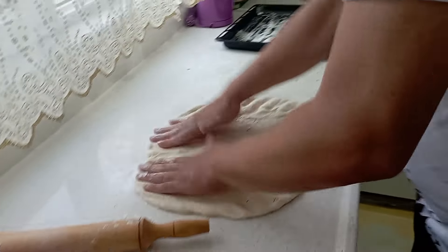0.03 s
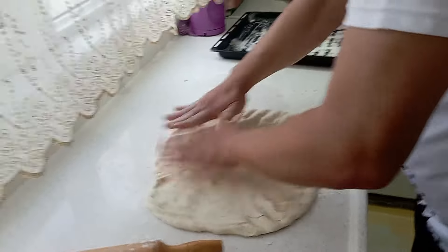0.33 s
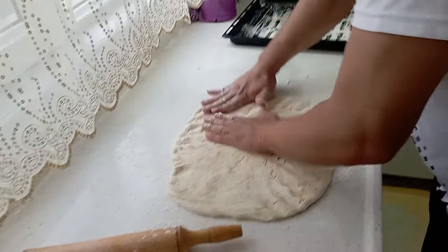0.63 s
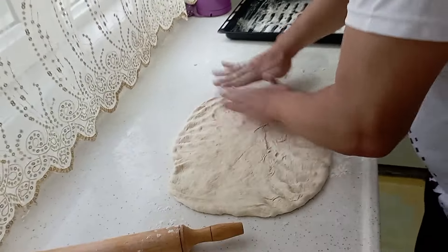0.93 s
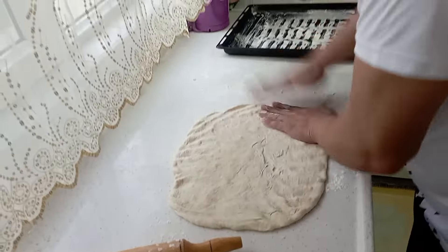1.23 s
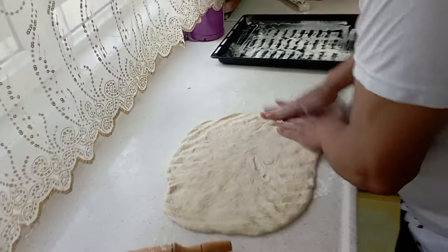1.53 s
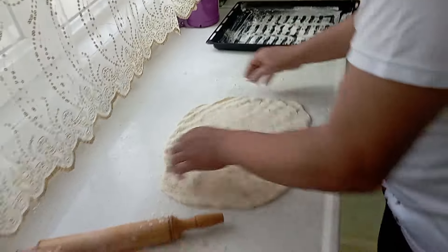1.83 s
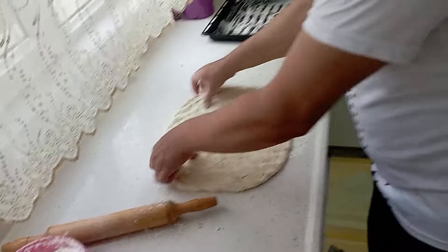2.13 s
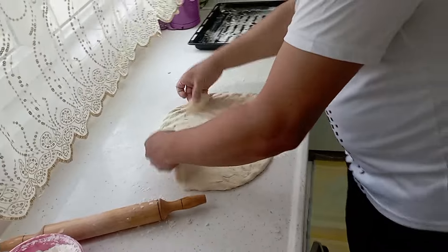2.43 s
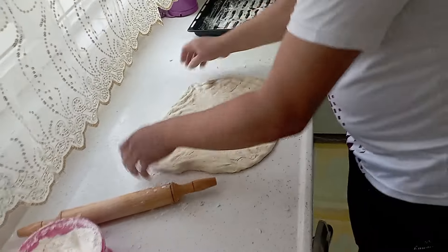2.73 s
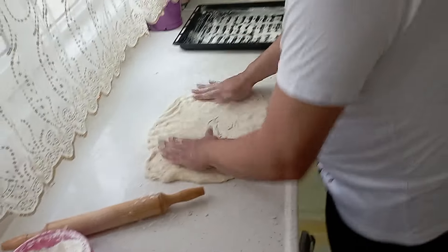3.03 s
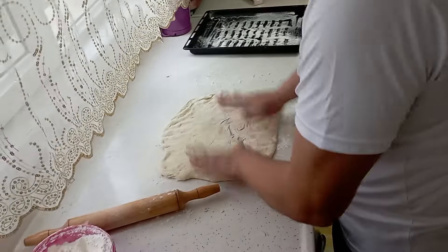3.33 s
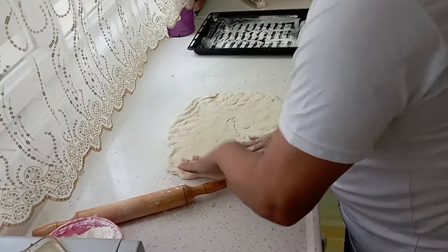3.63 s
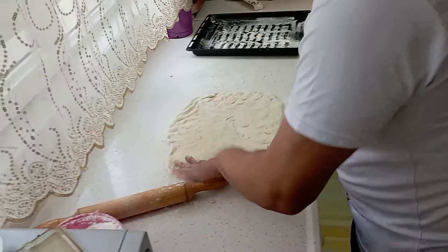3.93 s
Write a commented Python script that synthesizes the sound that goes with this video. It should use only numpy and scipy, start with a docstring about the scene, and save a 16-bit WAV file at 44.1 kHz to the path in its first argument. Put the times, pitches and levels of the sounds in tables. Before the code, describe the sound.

Dough is patted flat by hand, each slap a moist smack with a dull thud. A faint sliding rustle fills a short gap before the slaps resume. A low appliance hum runs underneath in a small, slightly echoing kitchen.

```python
"""Two hands pat a round of soft dough flat on a counter, heard in stereo in a small, hard-walled kitchen.
Each slap is a wet crackle of skin, a pop of trapped air, a thud of dough and the push of the arm;
the counter rings, and the microphone gets more room than direct sound. In the pause the dough is slid,
and a faint, bright hiss swells and fades, with a slight rustle midway. An appliance hums behind,
and a few faint whistles come and go in the distance."""
import sys
import numpy as np
from scipy import signal
from scipy.fft import rfft, irfft, next_fast_len
from scipy.io import wavfile
from scipy.ndimage import uniform_filter1d

SR = 44100
rng = np.random.default_rng(int(sys.argv[2]) if len(sys.argv) > 2 else 0)


def transcribe(signal):
    """Save signal, clipped to [-1, 1], as a 16-bit WAV file at the path in sys.argv[1]."""
    frames = np.atleast_2d(signal).T
    limited = np.clip(frames, -1, 1)
    pcm = np.round(limited * 32767).astype(np.int16)
    wavfile.write(sys.argv[1], SR, pcm)


N = 176400
LEAD, ROOM_SIZE = SR // 10, 3 * SR // 5   # samples of run-in and of room tail


def from_db(db):
    """Decibels to gain."""
    return 10 ** (np.asarray(db) / 20)


def unit(x):
    """Scale each channel to energy 1."""
    return x / np.sqrt(np.sum(x ** 2, axis=-1, keepdims=True) + 1e-20)


def at_hz(points, hz):
    """Read a table on a log-frequency axis."""
    freqs, values = np.transpose(points)
    return np.interp(np.log(hz), np.log(freqs), values)


def colour(x, spectrum):
    """Causal (minimum-phase) filter with the given dB curve."""
    size = next_fast_len(x.shape[-1] + LEAD) * 2
    hz = np.maximum(np.fft.rfftfreq(size, 1 / SR), 1)
    cepstrum = irfft(np.log(from_db(at_hz(spectrum, hz))))
    cepstrum[1:size // 2] *= 2
    cepstrum[size // 2 + 1:] = 0
    return irfft(rfft(x, size) * np.exp(rfft(cepstrum)))[..., :x.shape[-1]]


def ring(hz, t60, t):
    """A damped sine of energy 1 that starts at t = 0."""
    t = np.maximum(t, 0)
    return unit(np.sin(2 * np.pi * hz * t) * from_db(-60 * t / t60))


def narrow(hz, width_hz):
    """Narrow noise around a pitch curve; rms 1."""
    pole = np.exp(-np.pi * width_hz / SR)
    noise = rng.standard_normal((2, len(hz) + LEAD))
    a, b = signal.lfilter([1], [1, -2 * pole, pole * pole], noise)[:, LEAD:]
    phase = 2 * np.pi * np.cumsum(hz) / SR
    return unit(a * np.cos(phase) + b * np.sin(phase)) * np.sqrt(len(hz))


def add(track, s, sound):
    """Mix a sound in at s seconds; the track starts LEAD samples early."""
    i = max(int(s * SR) + LEAD, 0)
    track[..., i:i + sound.shape[-1]] += sound[..., :track.shape[-1] - i]


def diffuse(size):
    """White noise from all round the microphone: the sides are alike in the bass, unrelated up top."""
    # Likeness of the two sides. Each row: frequency in Hz, correlation from 0 to 1.
    likeness = [(60, 0.99), (180, 0.91), (350, 0.84), (700, 0.38), (1400, 0), (4000, 0.08), (16000, 0)]
    mid, side = rfft(rng.standard_normal((2, size)))
    alike = at_hz(likeness, np.maximum(np.fft.rfftfreq(size, 1 / SR), 1))
    return irfft(np.sqrt(1 + alike) * mid + np.sqrt(1 - alike) * side * [[1], [-1]], size)


def room_tone():
    """The low, steady noise of the kitchen."""
    # Spectrum of the room tone. Each row: frequency in Hz, relative level in dB.
    floor = [(25, -20), (45, -17.5), (90, -1.5), (160, -2.5), (260, -8), (430, -13), (620, -20),
             (1000, -28), (1800, -33), (4000, -37), (7000, -38), (10500, -34.5), (16000, -47)]
    noise = colour(diffuse(N + LEAD), floor)[:, LEAD:]
    return from_db(-49.5) * unit(noise) * np.sqrt(N)


def appliance():
    """An appliance hums at the back, each of its tones wavering on its own."""
    # Tones of the hum. Each row: pitch in Hz, level in dB.
    hum = [(102, -57), (161, -64.5), (262, -62), (361, -67), (458, -59.5), (560, -69)]
    return sum(from_db(db) * narrow(np.full(N, hz), width_hz=1.48) for hz, db in hum)


def whistles():
    """Very faint, thin tones fade in and out in the distance."""
    # Each row: start in seconds, length in seconds, level in dB, pitch in Hz.
    tones = [(2.542, 0.12, -74, 6500), (2.697, 0.36, -73, 1050), (2.83, 0.42, -77, 6450)]
    out = np.zeros(N + LEAD)
    for s, length, db, hz in tones:
        size = int(length * SR)
        tone = narrow(np.full(SR, hz), width_hz=40)[:size]
        add(out, s, from_db(db) * signal.windows.tukey(size) * tone)
    return out[LEAD:]


def hiss():
    """A faint, bright hiss that swells and fades in the pause, with a slight rustle midway."""
    # Swell of the hiss. Each row: time in seconds, level in dB.
    swell = [(1.5, -80), (1.7, -61), (2.02, -67), (2.1, -59.5), (2.2, -62), (2.29, -61.5), (2.4, -67),
             (2.62, -66.5), (2.72, -63), (2.82, -82)]
    # Spectrum of the hiss. Each row: frequency in Hz, relative level in dB.
    spectrum = [(1500, -9), (4000, -5), (6500, -9), (10500, -2), (16000, -28)]
    s, db = np.transpose(swell)
    envelope = np.interp(np.arange(N) / SR, s, from_db(db), left=0, right=0)
    return envelope * unit(colour(diffuse(N), spectrum)) * np.sqrt(N)


def kitchen(near, radiated):
    """The near sound reaches the right side first; what is radiated returns densely from the walls."""
    # Decay of the room. Each row: frequency in Hz, seconds to fall 60 dB.
    room_t60 = [(80, .5), (200, 0.67), (500, 0.4962), (1500, 0.44), (4000, 0.36), (10000, .3), (16000, 0.3)]
    # Strength of the room. Each row: frequency in Hz, level in dB against the direct sound.
    room_db = [(40, -5), (100, 9.5), (250, 4.5), (600, 5), (1500, 6.5), (4000, 2.5), (9000, 3.5),
               (16000, 3)]
    build_s, early_db, early_s, left_lag_s = 0.0027, 1, 0.03, 0.0001
    t = np.arange(ROOM_SIZE) / SR
    white, tail = (diffuse(ROOM_SIZE), diffuse(ROOM_SIZE)), 0
    build = 1 - np.exp(-(t / build_s) ** 2)
    early_lift = 1 + from_db(early_db) * np.exp(-t / early_s) / 2
    edges_hz = 22 * 2 ** (np.arange(20) / 2)   # half octaves
    for k, (low, high) in enumerate(zip(edges_hz, edges_hz[1:])):
        hz = np.sqrt(low * high)
        bandpass = signal.butter(2, (low, high), "band", fs=SR, output="sos")
        band = signal.sosfilt(bandpass, white[k % 2])[:, ::-1]
        envelope = build * early_lift * np.exp(-np.log(1000) * t / at_hz(room_t60, hz))
        gain = from_db(at_hz(room_db, hz)) * np.sqrt(2 * (high - low) / SR)
        tail = tail + gain * unit(band * envelope)
    direct = np.array([np.roll(near, round(left_lag_s * SR)), near])
    return direct + signal.fftconvolve(radiated[None], tail)[:, :len(near)]


def slides():
    """Fingers and dough slide on the counter: short swishes that fall in pitch as the sliding slows."""
    # Each row: start in seconds, length in seconds, dry level in dB, first and last pitch in Hz.
    strokes = [(2.064, 0.087, -62.5, 3640, 3290), (2.066, .06, -66, 4790, 4600),
               (2.121, .07, -68.5, 3150, 2640)]
    out = np.zeros(N + LEAD)
    for s, length, db, first_hz, last_hz in strokes:
        size = int(length * SR)
        hz = np.interp(np.arange(SR // 2), [0, size], [first_hz, last_hz])
        swish = narrow(hz, width_hz=370)[:size]
        add(out, s, from_db(db) * signal.windows.tukey(size) * swish)
    return out


def counter_ring():
    """The counter and its cupboard ring on after a blow."""
    # Each row, one mode: pitch in Hz, relative level in dB, seconds to fall 60 dB.
    modes = [(83.3, -21, 1), (177.6, -16.5, 0.15), (261.3, -14.5, 0.93), (297.5, -17, 0.96),
             (357.7, -9, 0.19), (395.6, -12, 0.17), (525, -15.5, 0.17), (640, -26, 0.45), (733, -20, 1),
             (1124, -37, 0.28)]
    t = np.arange(ROOM_SIZE) / SR
    return sum(from_db(db) * ring(hz, t60, t) * np.sqrt(2 * hz / SR) for hz, db, t60 in modes)


def knock(hz, t, cycles):
    """A soft-edged resonance that is gone after a few cycles; energy 1."""
    attack = np.clip(t * hz * 2, 0, 1)
    return unit(np.gradient(ring(hz, cycles / hz, t) * attack))


def crackle(t, lead_s):
    """Skin closes on the dough in tiny contacts: fingers, then the palm with one sharp crack; energy 1."""
    fingers_settle_s, palm_settle_s = 0.0047, 0.00074
    fingers_db, crack_db, grain_db, smooth_hz = -8, -12, 3.5, 900
    fingers = from_db(fingers_db) * (t >= -lead_s) * np.exp(-np.abs(t + lead_s) / fingers_settle_s)
    palm = (t >= 0) * np.exp(-np.abs(t) / palm_settle_s)
    grains = from_db(grain_db * np.repeat(rng.standard_normal(len(t)), repeats=8)[:len(t)])
    contacts = unit((fingers + palm) * grains * rng.standard_normal(len(t)))
    spectrum = rfft(contacts + from_db(crack_db) * (t == 0))
    # dividing by the smoothed spectrum leaves the crackle white overall
    power = np.abs(spectrum) ** 2
    for _ in range(3):
        power = uniform_filter1d(power, int(smooth_hz * len(t) / SR))
    return unit(irfft(spectrum / np.sqrt(power + 1e-12), len(t)))


def skin_spectrum(smack_db, smack_hz, sizzle_db):
    """The smack, lifted near its pitch by the hollow of the hand, plus the sizzle of squeezed air."""
    # Spectra of smack and sizzle. Each row: frequency in Hz, relative level in dB.
    smack_shape = [(300, -11.5), (600, -27.5), (900, -2), (1400, -5.5), (2400, -5.5), (3600, -2.5),
                   (5500, -7), (9000, -41), (16000, -28)]
    sizzle_shape = [(2000, -19.5), (4000, -12.5), (6000, -4.5), (8000, -3.5), (10000, -2), (12000, -6),
                    (14000, -14), (16000, -17.5)]
    hollow_db, hollow_octaves = 5, 0.15
    hz = np.linspace(50, SR / 2, 400)
    hollow = hollow_db * np.exp(-(np.log2(hz / smack_hz) / hollow_octaves) ** 2)
    smack = from_db(smack_db) * unit(from_db(at_hz(smack_shape, hz) + hollow))
    sizzle = from_db(sizzle_db) * unit(from_db(at_hz(sizzle_shape, hz)))
    gain = np.hypot(smack, sizzle) * np.sqrt(len(hz))
    return np.column_stack([hz, 20 * np.log10(gain)])


def slaps():
    """Hands strike the dough; each blow lands on a new spot and meets the room differently."""
    # Slaps and lighter touches. Each row: the palm's landing and the fingers' lead in seconds, push in
    # dB, then thud, air pop and smack, each in dB and Hz, and sizzle in dB.
    pats = [ (-0.004, 0.0071, -43, -34, 189, -38.5, 330, -38, 2070, -36),
            (0.191, 0.006, -42, -39.5, 170, -58, 326, -49.5, 2000, -50),
            (0.2157, 0.0036, -45, -30.5, 222, -33, 328, -35.5, 3900, -25.5),
            (0.418, 0.004, -52, -47, 149, -49, 348, -47, 2080, -46.5),
            (0.4497, 0.0014, -36, -33, 143, -34.5, 481, -38, 2340, -38),
            (0.617, 0.0022, -35.5, -38.5, 154, -45, 480, -50.5, 2040, -50),
            (0.6488, 0.0023, -42, -33.5, 131, -36, 398, -36, 2410, -35),
            (0.8263, 0.0075, -42.5, -29, 148, -34.5, 410, -35, 1460, -38),
            (1.0063, 0.0049, -37.5, -36, 155, -38, 407, -39, 2470, -37),
            (1.252, .003, -52, -39.5, 155, -41.5, 470, -49.5, 2380, -54),
            (1.2597, 0.0042, -34, -30, 145, -33.5, 370, -38.5, 2200, -38),
            (1.501, 0.00063, -30.5, -30.5, 119, -24.5, 367, -32.5, 3150, -36.5),
            (2.703, .006, -78, -52.5, 194, -57, 500, -62.5, 1170, -62.5),
            (3.032, .009, -46.5, -46.5, 129, -50.5, 457, -55, 1520, -55.5),
            (3.213, 0.0056, -41, -35, 148, -41, 390, -40.5, 2230, -38),
            (3.3902, 0.0041, -31, -32, 137, -40.5, 390, -37, 1400, -40),
            (3.440, 0.0056, -39, -32.5, 163, -42, 383, -47.5, 1450, -47.5),
            (3.599, .0015, -41, -32, 135, -44.5, 432, -43.5, 3900, -40),
            (3.768, .001, -45.5, -46.5, 140.6, -56.5, 400, -62.5, 2400, -59),
            (3.7911, 0.00091, -42, -40, 158, -49, 364, -51.5, 2400, -46),
            (3.9666, 0.0023, -44.5, -45.5, 156, -43, 480, -47, 4240, -43.5)]
    level_window_s = 0.025   # the levels are dry, averaged over this time
    thud_lag_s, push_lag_s, push_hz = 0.001815, 0.0036, 91.8   # the weight of the arm arrives last
    out = np.zeros((2, N + LEAD))
    t = (np.arange(ROOM_SIZE) - LEAD // 4) / SR
    counter = counter_ring()
    for s, lead_s, push_db, thud_db, thud_hz, pop_db, pop_hz, smack_db, smack_hz, sizzle_db in pats:
        # the microphone hears each tiny contact; the walls merge them into one pulse
        pulse = signal.unit_impulse(LEAD, np.searchsorted(t, -lead_s / 2))
        contact = np.array([crackle(t[:LEAD], lead_s), pulse])
        skin = colour(contact, skin_spectrum(smack_db, smack_hz, sizzle_db))
        skin = np.pad(skin, ((0, 0), (0, len(t) - LEAD)))
        pop = from_db(pop_db) * knock(pop_hz, t, cycles=3.12)
        thud = from_db(thud_db) * knock(thud_hz, t - thud_lag_s, cycles=5.57)
        push = from_db(push_db) * knock(push_hz, t - push_lag_s, cycles=3.15)
        body = pop + thud + push
        near, radiated = skin + body + signal.fftconvolve(body, counter)[:len(t)]
        add(out, s + t[0], kitchen(near, radiated))
    return out * np.sqrt(level_window_s * SR)


def scene():
    """Hands and dough over the kitchen's background; most of their treble leans to the right."""
    # Balance of the hands at the microphone. Each row: frequency in Hz, left minus right in dB.
    lean = [(300, -0.16), (1400, -1.7), (2800, -5), (5600, -8), (9000, -8), (13000, 1.5)]
    swish = slides()
    left, right = slaps() + kitchen(swish, swish)
    hands = np.array([colour(left, [(hz, db / 2) for hz, db in lean]),
                      colour(right, [(hz, -db / 2) for hz, db in lean])])
    return hands[:, LEAD:] + hiss() + appliance() + room_tone() + whistles()


def record(dry):
    """The microphone sheds the deepest bass; the very top is cut steeply."""
    low_cut = signal.butter(4, 47, "high", fs=SR, output="sos")
    high_cut = signal.ellip(10, .2, 80, 16200, fs=SR, output="sos")
    return signal.sosfilt(high_cut, signal.sosfilt(low_cut, dry))


dry = scene()
out = record(dry)
transcribe(out)
```